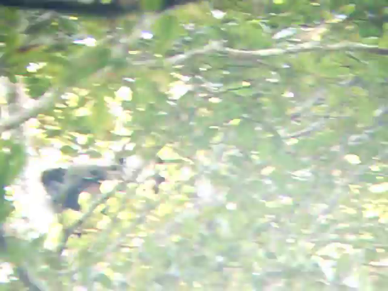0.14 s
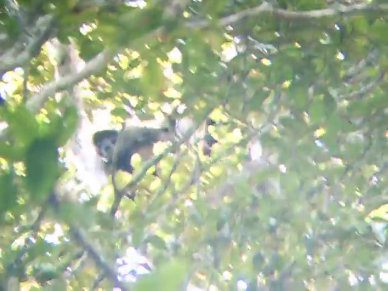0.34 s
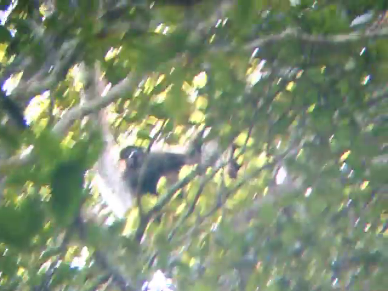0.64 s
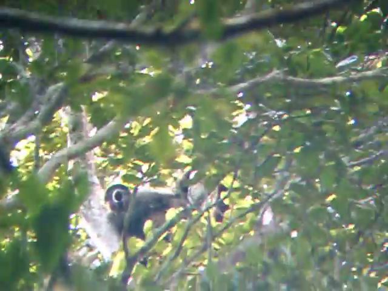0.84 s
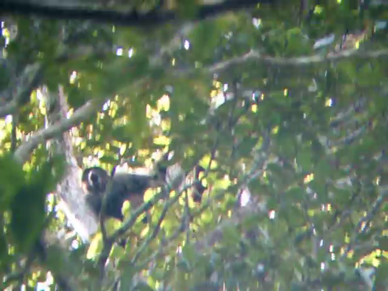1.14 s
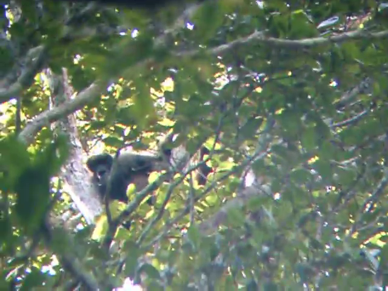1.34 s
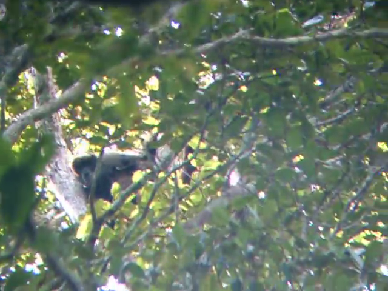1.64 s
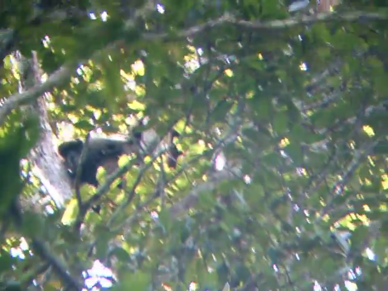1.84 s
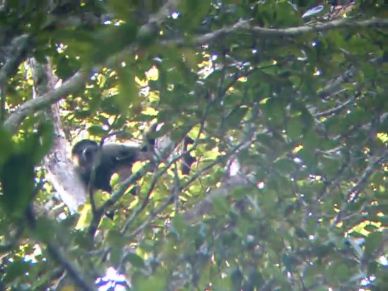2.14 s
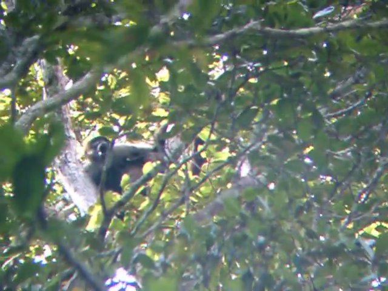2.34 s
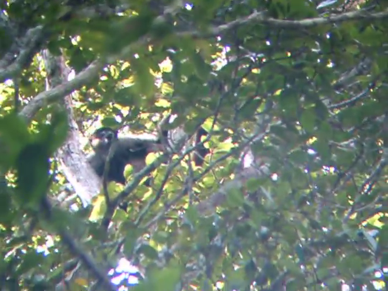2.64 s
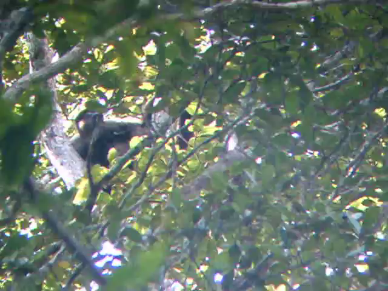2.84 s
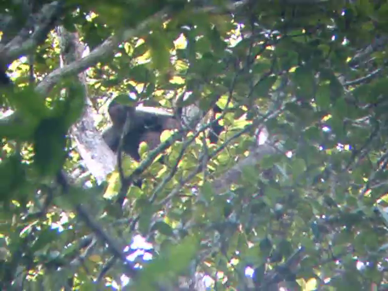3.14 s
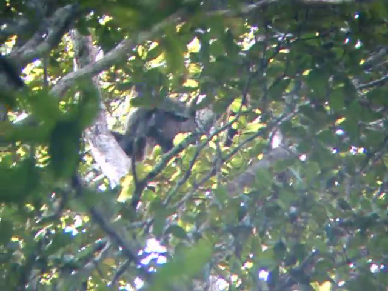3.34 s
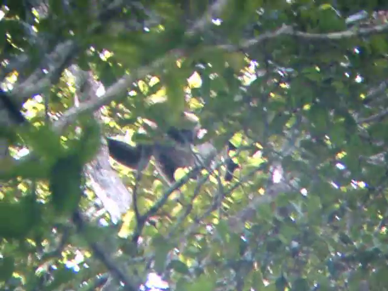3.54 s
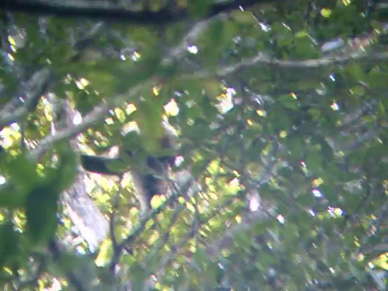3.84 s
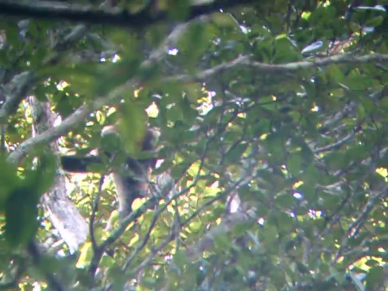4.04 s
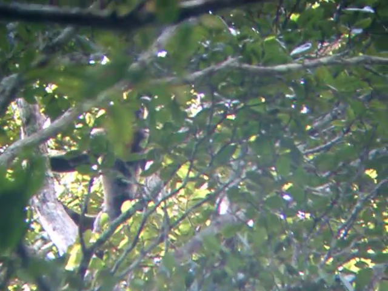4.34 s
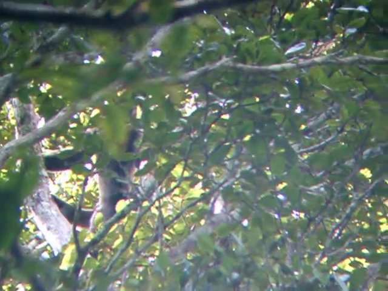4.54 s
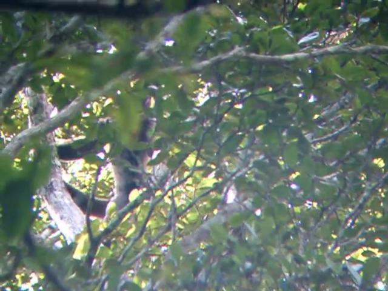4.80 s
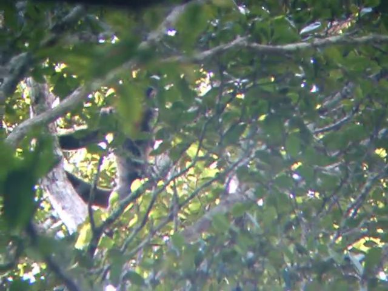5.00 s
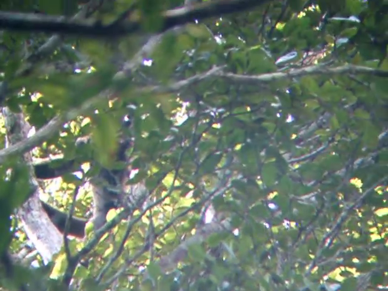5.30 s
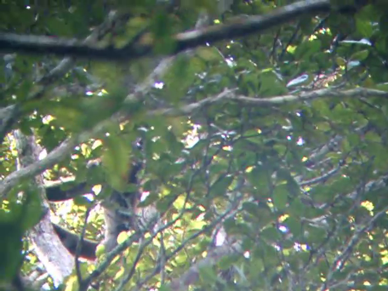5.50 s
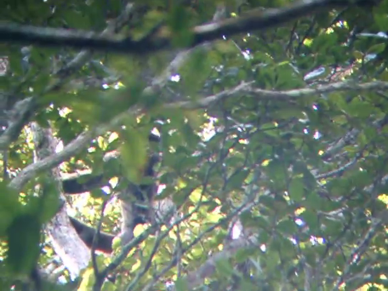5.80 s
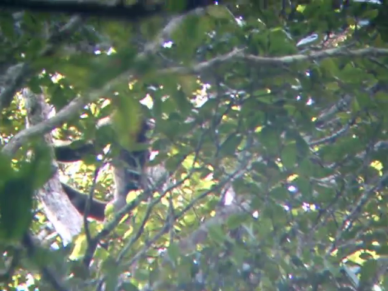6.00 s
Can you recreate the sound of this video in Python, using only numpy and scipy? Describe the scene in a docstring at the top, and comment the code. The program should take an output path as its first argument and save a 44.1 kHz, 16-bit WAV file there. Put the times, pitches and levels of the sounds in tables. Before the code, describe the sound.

A monkey in a rainforest canopy whistles short, arched, raspy calls nearly three a second, echoing among trees, with handling knocks and one sharp click.

```python
"""A monkey in the canopy gives short arched whistles, nearly three a second: near sines whose pitch climbs and
plunges, and which in most calls break into a rasp. Hoarse low notes (harmonics and throat noise), many under a
break where the cracking voice adds a rough lower pitch, and far moans (sliding tones) join them; dense decaying
echoes let the forest ring after every call. A cricket chirps and insects buzz high (narrow noise bands) over a
faint leafy hiss (shaped noise); fingers knock on the body of a hand-held camera, once hard (decaying modes)."""
import sys
import numpy as np
from scipy import signal
from scipy.fft import rfft
from scipy.io import wavfile
from scipy.ndimage import uniform_filter1d

SR = 44100
rng = np.random.default_rng(int(sys.argv[2]) if len(sys.argv) > 2 else 0)


def master(y):
    """Save y as 16-bit WAV."""
    cut = np.clip(np.atleast_2d(y).T, -1, 1)
    pcm = np.round(cut * 32767)  # scale
    wavfile.write(sys.argv[1], SR, pcm.astype(np.int16))


def magnitude_from_level(level_db):
    """Linear magnitude for a level in decibels (20 dB per decade)."""
    exponent = np.asarray(level_db, float) / 20
    return 10 ** exponent


N = 271656  # length in samples

# Whistles. Each row: start in seconds, length up to the foot of the plunge in seconds, top pitch in Hz,
# time constant of the plunge in seconds, opening level in dB, closing level in dB, step per overtone in dB.
WHISTLES = [(.045, .108, 1810, .017, -26, -22, -12), (.495, .168, 1870, .042, -27, -20.5, -10),
            (.922, .138, 1900, .028, -26, -21, -11), (1.235, .143, 1760, .018, -24, -22.5, -11),
            (1.58, .142, 1810, .015, -20, -22.5, -11), (2.0, .123, 1880, .018, -25, -19, -9),
            (2.4, .16, 1870, .022, -24, -20, -9.5), (2.78, .118, 1840, .02, -22, -23.5, -10),
            (3.105, .132, 1930, .024, -25, -23, -9), (3.435, .132, 1980, .018, -26, -26, -8),
            (3.782, .16, 1790, .012, -24, -23, -16), (4.315, .113, 1850, .024, -26, -21, -16),
            (4.668, .148, 2030, .028, -35, -26.5, -9), (4.985, .145, 1900, .024, -32, -27, -9),
            (5.29, .15, 1960, .025, -32, -26.5, -9), (5.6, .17, 1900, .028, -31, -25, -9),
            (5.975, .13, 1880, .03, -28, -24, -10)]
# Breaks, where the voice leaps up and cracks inside a whistle. Each row: start in seconds, length in seconds,
# pitch after the leap in Hz, pitch before the return in Hz, level in dB, added roughness (capped later),
# depth of the strong-weak pulsing (0-1).
BREAKS = [(.95, .066, 1930, 1922, -31, 0.65, 0.5), (1.266, .05, 2600, 2731, -27, .8, 0.4),
          (1.626, .065, 1850, 1817, -21.5, 0.56, 0.29), (2.045, 0.042, 1950, 1902, -26, .5, 0.08),
          (3.139, .045, 2250, 2029, -28.5, 0.7, 0.4), (3.469, .078, 2850, 2100, -21.5, 0.65, 0.47),
          (3.834, .055, 2250, 2105, -24.5, 1.1, .35), (4.682, .075, 2708, 2100, -24.5, .65, 0.2),
          (5.004, 0.048, 2210, 2256, -25, 0.36, 0.3), (5.317, .058, 2700, 2390, -23, 0.6, 0.3),
          (5.65, .055, 2250, 2600, -25, 0.8, 0.5), (6.015, .045, 1950, 1885, -26.5, 0.7, 0.4)]
# Throat response, with dips that a falling partial drops through. Each row: frequency in Hz, gain in dB.
THROAT = [(1200, 0), (1400, -5), (1650, 0), (2450, -2), (2750, -5), (2900, -18), (3150, -3), (3900, 0),
          (4400, -18), (5000, 0), (5600, -2), (6200, -14)]
# Hoarse low notes, many under a break, where the cracking voice adds a rough lower pitch. Each row: start in
# seconds, level in dB, length in seconds, middle pitch in Hz, step per overtone in dB, roughness (0-1).
LOW_NOTES = [(0.206, -40.5, 0.09, 1200, -12.5, .8), (.56, -37.5, 0.054, 1175, -19.5, .9),
             (0.985, -35, .07, 1120, -16, .75), (1.266, -29, 0.038, 1134, -12, .5),
             (1.318, -44, 0.038, 1000, -28, .9), (2.05, -47, .05, 928, -29, .9),
             (2.436, -40.5, .06, 900, -18.5, .8), (3.01, -33, 0.089, 1117, -15.5, .6),
             (3.155, -30, 0.066, 1120, -10, .65), (3.466, -28, .11, 1120, -12, .75),
             (3.84, -31, 0.075, 956, -10, .95), (4.666, -32, 0.035, 1150, -8, .6),
             (4.725, -27.5, 0.04, 1090, -8, .75), (5.015, -25.5, .045, 1120, -14, .2),
             (5.092, -31, 0.068, 1120, -23, .45), (5.315, -26, .06, 1120, -12, .45),
             (5.615, -29.5, .085, 1020, -22, .95), (6.015, -33, 0.09, 913, -6, .9),
             (6.1, -27, .05, 1150, -14, .3)]
# Throat resonances of a low note. Each row: frequency in Hz, width of one smoothing stage in Hz, level in dB.
LOW_NOTE_THROAT = [(798, 100, -5.5), (1104, 120, 12.5), (2310, 530, 20), (3900, 1000, -21)]
# Falling moans. Each row: start in seconds, level in dB, length in seconds, first pitch in Hz, last pitch in Hz.
MOANS = [(1.43, -31.5, 0.057, 1132, 960), (2.325, -35.5, 0.058, 1270, 1080),
         (2.625, -34.5, 0.12, 1250, 765), (4.2, -35, .075, 1241, 1083), (4.615, -47, 0.046, 1550, 1210)]
# Reverberation of the forest. Each row: frequency in Hz, time to decay by 60 dB in seconds.
FOREST_DECAY = [(600, 0.6), (1200, 0.81), (2000, 0.66), (4000, 1.035), (7000, 0.59)]
# Knocks. Each row: start in seconds, strength in dB, tilt of the modes above 600 Hz in dB per octave,
# level of the hollow after-ring in dB.
KNOCKS = [(.045, -33, -5, -63), (.185, -29.5, -21, -41.5), (.342, -34, -8, -45), (0.669, -43.5, 8, -54),
          (0.8479, -34.5, 12, -57), (.8507, -20.5, 9.5, -32), (.8527, -13, 5.5, -29.5),
          (1.082, -43, 7, -83), (1.571, -41, 8, -73), (1.639, -24, 7, -43.5), (1.79, -32, 5, -52.5),
          (1.898, -39, 7.5, -70), (2.088, -39, 2, -67), (2.415, -42, 8, -73), (3.247, -30.5, -7, -56),
          (3.626, -37.5, 3.5, -59), (4.1, -42, -7, -64), (4.141, -43, -3, -56), (5.028, -43, 9.5, -63),
          (6.113, -29.5, 6, -66)]
# Modes of the camera body. Each row: nominal frequency in Hz, relative level in dB, 60 dB decay in seconds.
BODY_MODES = [(202, -2.5, 0.028), (375, -1.5, 0.02), (577, 5.5, 0.026), (918, 4.5, 0.019),
              (1206, -3, 0.051), (1600, -6, 0.011), (2157, 8.5, 0.0046), (3140, -16, 0.022),
              (4500, -11, 0.0036), (6125, -20, 0.0089)]
# Spectrum of the hiss. Each row: frequency in Hz, relative level in dB per Hz.
HISS_SPECTRUM = [(15, -42), (25, -27.5), (47, -40), (85, -29), (724, -26), (1100, -12.5), (1510, -10.5),
                 (1740, -5), (1970, -23.5), (3450, -31.5), (4300, -27), (5300, -26), (6200, -25.5),
                 (8510, -43), (11100, -82.5), (18700, -120)]
# Lower insect bands. Each row: frequency in Hz, width of one smoothing stage in Hz, relative level in dB.
INSECTS = [(5755, 290, -6.5), (6030, 130, -3)]
# Swells and rests of the lower insect bands. Each row: time in seconds, gain in dB.
CHORUS_SWELL = [(0.0, -58), (1.1, -54), (1.97, -60.5), (2.25, -63), (2.6, -58.5), (3.6, -53), (4.3, -57.5),
                (5.4, -60.5), (6.16, -56)]
# Swells and rests of the higher insect band. Each row: time in seconds, level in dB before the throb.
HIGH_BUZZ_SWELL = [(0, -76.5), (3.9, -76), (4.3, -68), (5.6, -64.5), (6.16, -69)]
# Chirps of the cricket. Each entry: start in seconds.
CHIRPS = [-.16, .25, .67, 1.08, 1.5, 1.93, 2.36, 2.78, 3.19, 3.6, 4.0, 4.45, 4.88, 5.33, 5.8]


def evened(x):
    """Power normalisation: scales to rms 1."""
    return x / np.sqrt(np.mean(x ** 2) + 1e-20)


def read(points, hz):
    """Interpolation of a spectrum along a logarithmic frequency axis."""
    f, value = np.transpose(points)
    return np.interp(np.log(hz + 1), np.log(f + 1), value)


def add(mix, s, sound):
    """Superposition: lays a sound into the mix at s seconds."""
    part = mix[round(s * SR):][:len(sound)]
    part += sound[:len(part)]


def resonate(x, hz, width):
    """Resonance by heterodyning: shifts hz down to zero, smooths twice and shifts back."""
    carrier = np.exp(2j * np.pi * np.cumsum(hz * np.ones(len(x))) / SR)
    r = np.exp(-np.pi * width / SR)
    smooth = signal.lfilter([(1 - r) ** 2], [1, -2 * r, r ** 2], x / carrier)
    return 2 * (carrier * smooth).real


def wobble(n, seconds):
    """Random modulation: white noise averaged over a short time, of rms 1."""
    return evened(uniform_filter1d(rng.standard_normal(n), max(round(seconds * SR), 2)))


def hiss():
    """Spectral shaping of noise: leaves and microphone noise as random short-time spectra with faint patches."""
    frames, hz = N // 512 + 5, np.fft.rfftfreq(2048, 1 / SR)
    real, imaginary, patches = rng.standard_normal((frames, 1025, 3)).T
    patches = evened(uniform_filter1d(uniform_filter1d(patches, 20, 0), 8, 1))
    spectrum_db = read(HISS_SPECTRUM, hz)[:, None] + 1.5 * patches
    spectra = (real + 1j * imaginary) * magnitude_from_level(spectrum_db)
    noise = signal.istft(spectra, nperseg=2048, noverlap=1536)[1][:N]
    return magnitude_from_level(-39.5) * evened(noise)


def insects():
    """Amplitude modulation: a far chorus of narrow noise bands throbs fast while it swells and rests."""
    throb_hz, throb_depth = 40, .4
    t = np.arange(N) / SR
    low = sum(magnitude_from_level(db) * evened(resonate(rng.standard_normal(N), f, w)) for f, w, db in INSECTS)
    high = evened(resonate(rng.standard_normal(N), hz=7800, width=900))
    low *= magnitude_from_level(np.interp(t, *np.transpose(CHORUS_SWELL)))
    high *= magnitude_from_level(np.interp(t, *np.transpose(HIGH_BUZZ_SWELL)))
    return (1 + throb_depth * np.sin(2 * np.pi * throb_hz * t)) * (low + high)


def cricket():
    """Gated resonance: bursts of a narrow band of noise, heard as a fuzzy tone."""
    chirp_s, ramp_s = 0.25, 0.022
    t = np.arange(N) / SR
    gate = sum(np.clip(np.minimum(t - s, s + chirp_s - t) / ramp_s, 0, 1) for s in CHIRPS)
    return magnitude_from_level(-53.5) * gate * evened(resonate(rng.standard_normal(N), hz=6105, width=110))


def contour(s, length, top_hz, plunge_s, opening_db, closing_db):
    """Exponential glides: time, pitch, level, plunge 0-1, strain and pulsing of a whistle and any break in it."""
    opening_hz, climb_s, foot_hz, linger_s = 1674, 0.02181, 1221.5, 0.022
    leap_s, return_s = .022, .004
    t = np.arange(-.008, length + linger_s + 0.017, 1 / SR)
    # the pitch climbs to the top, then plunges ever faster to its foot and lingers there
    plunge = np.exp(np.minimum(t - length, 0) / plunge_s)
    climb = (top_hz - opening_hz) * np.exp(-np.maximum(t, 0) / climb_s)
    hz = top_hz - climb - (top_hz - foot_hz) * plunge
    # the level reaches its closing value a little before the foot, then sinks
    level_db = np.interp(t, [0, length - 0.035, length, length + linger_s],
                         [opening_db, closing_db, closing_db - 7, closing_db - 16.5])
    strain, pulsing = np.zeros((2, len(t)))
    for at, span, up_hz, back_hz, db, rough, depth in BREAKS:
        u = s + t - at
        leap = np.clip(np.minimum(u / leap_s, (span - u) / return_s), 0, 1)
        hz += leap * (np.interp(u, [leap_s, span - return_s], [up_hz, back_hz]) - hz)
        level_db += leap * (db - level_db)
        strain += leap * rough
        pulsing += leap * depth
    return t, *(uniform_filter1d(c, size=200) for c in (hz, level_db, plunge, strain, pulsing))


def whistle(s, length, top_hz, plunge_s, opening_db, closing_db, steady_db):
    """Additive synthesis: a near sine and two overtones; a break brings rasps of noise around each partial,
    and alternately strong and weak pulses add lines half-way between the partials (period doubling)."""
    most_rough, hoarse = .85, .12  # roughness 0-1: highest, and of the unbroken voice
    t, hz, level_db, plunge, strain, pulsing = contour(s, length, top_hz, plunge_s, opening_db, closing_db)
    # overtones are faint at the opening, gain in the plunge and thin out in a high voice
    step_db = steady_db - 13.5 * np.clip(1 - t / 0.035, 0, 1) + 5 * plunge
    step_db -= 16 * np.clip((hz - 1950) / 400, 0, 1)
    warm = np.clip(t / .03, 0, 1)  # the basic hoarseness sets in gradually
    rough = np.clip(hoarse * warm + strain + .25 * plunge, .05, most_rough)
    turns = np.cumsum(hz * (1 + 0.0403 * rough * wobble(len(t), .003))) / SR
    third_db = 2 * step_db - 1 - 16 * plunge  # the plunge weakens the third partial
    voice = 0
    for k, db in enumerate([0, step_db, third_db]):
        partial_hz = (k + 1) * hz
        rasp = evened(resonate(rng.standard_normal(len(t)), partial_hz, (k + 1) * 280))
        frayed = np.minimum(rough * (1 + k / 3), most_rough)  # overtones fray first
        tone = np.sqrt(2) * np.sin(2 * np.pi * (k + 1) * turns)
        blend = np.sqrt(1 - frayed ** 2) * tone + frayed * rasp
        voice = voice + magnitude_from_level(db + read(THROAT, partial_hz)) * blend
    voice *= 1 + pulsing * np.cos(np.pi * turns)
    # air rushes through the strained throat
    breath = resonate(rng.standard_normal(len(t)), hz=4500, width=2000)
    breath = resonate(breath, hz=4500, width=2000)
    voice += strain * magnitude_from_level(-15) * evened(breath)
    voice *= 1 + .28 * wobble(len(t), .008)  # leaves in the path make the level flutter
    return s + t[0], magnitude_from_level(level_db) * voice * signal.windows.tukey(len(t), .15)


def forest(x):
    """Reverberation by scattering: trunks and leaves return dense random echoes, decaying faster in some bands."""
    echoes = np.zeros(N)
    for k in range(3):  # three sets of echoes take turns, so that no two calls ring alike
        hz, t, spectra = signal.stft(rng.standard_normal(SR + SR // 2), SR, nperseg=256)
        swell = np.clip(t / 0.0024, 0, 1)
        decay = magnitude_from_level(-60 * t / read(FOREST_DECAY, hz)[:, None])
        tail = signal.istft(spectra * swell * decay, SR, nperseg=256)[1]
        tail = tail / np.sqrt(np.mean(abs(rfft(tail)[1500:4500]) ** 2))  # unit gain about the calls' pitch
        share = np.sqrt(2 / 3) * np.cos(np.pi * (np.arange(N) / SR + k / 3))
        echoes += signal.fftconvolve(x * share, tail)[:N]
    return echoes


def knock(s, strength_db, tilt_db, hollow_db):
    """Modal synthesis: a tap rings the camera body's modes; a soft finger leaves the high ones quiet."""
    t = np.arange(round(.2 * SR)) / SR
    ring = np.zeros(len(t))
    for k, (hz, db, t60) in enumerate(BODY_MODES):
        mode_db = strength_db + db + tilt_db * np.log2(max(hz / 600, 1))
        tone = np.sin(2 * np.pi * hz * rng.uniform(1.0, 1.03) * t)
        ring += (-1) ** k * magnitude_from_level(mode_db - 60 * t / t60) * tone
    hollow_hz, hollow_t60 = 260.6, 0.3  # after-ring: Hz, 60 dB decay in s
    ring += magnitude_from_level(hollow_db - 60 * t / hollow_t60) * np.sin(2 * np.pi * hollow_hz * t)
    return s, ring * (1 - np.exp(-t / 0.00037))  # the contact builds up over a moment


def low_note(s, level_db, length, hz, step_db, rough):
    """Source and filter: harmonics, sagging the more the hoarser, blend with breath puffs that ring in the throat."""
    u = np.linspace(0, 1, round(length * SR))
    sag = 1 + .3 * rough * (.5 - u)
    waver = 1 + .07 * rough * wobble(len(u), .004)
    turns = np.cumsum(hz * sag * waver) / SR
    folds = sum(magnitude_from_level(k * step_db) * np.sin(2 * np.pi * (k + 1) * turns) for k in range(4))
    puffs = rng.standard_normal(len(u)) * np.maximum(1 + 0.83 * wobble(len(u), 0.002), 0)
    breath = 0
    for throat_hz, width, db in LOW_NOTE_THROAT:
        slope_db = step_db * np.log2(throat_hz / hz)
        breath = breath + magnitude_from_level(db + slope_db) * evened(resonate(puffs, throat_hz, width))
    voice = (1 - rough) * evened(folds) + rough * evened(breath)
    return s, magnitude_from_level(level_db) * evened(voice) * signal.windows.tukey(len(u), .4)


def moan(s, level_db, length, from_hz, to_hz):
    """Frequency modulation: a wavering tone and its octave slide down, blended with noise around the pitch."""
    rough = .65  # share of noise 0-1
    hz = np.linspace(from_hz, to_hz, round(length * SR))
    turns = np.cumsum(hz * (1 + .03 * wobble(len(hz), .004))) / SR
    tone = np.sin(2 * np.pi * turns) + magnitude_from_level(-18) * np.sin(4 * np.pi * turns)
    rasp = resonate(rng.standard_normal(len(hz)), hz, width=220)
    voice = (1 - rough) * evened(tone) + rough * evened(rasp)
    return s, magnitude_from_level(level_db) * evened(voice) * signal.windows.tukey(len(hz), .5)


def scene():
    """Superposition and clipping: near sounds overload the small microphone on the hardest knock
    and lose their bass; the background joins them."""
    calls, knocks = np.zeros((2, N))
    for table, voice in ((WHISTLES, whistle), (LOW_NOTES, low_note), (MOANS, moan)):
        for row in table:
            add(calls, *voice(*row))
    for row in KNOCKS:
        add(knocks, *knock(*row))
    ceiling = .62  # amplitude at which the microphone overloads
    near = np.clip(calls + magnitude_from_level(-1.5) * forest(calls) + knocks, -ceiling, ceiling)
    low_cut = signal.butter(N=4, Wn=180, btype="high", fs=SR, output="sos")
    near = signal.sosfilt(low_cut, near)
    return (near + hiss() + insects() + cricket())[None]


def top_cut(x):
    """Nothing passes above the cut-off."""
    return signal.sosfilt(signal.butter(12, 8660, fs=SR, output="sos"), x)


def record(dry):
    """Linear filtering: a low-pass limits the band to 8600 Hz, and a small constant offset is added."""
    low_pass = signal.firwin(255, 8600, window=("kaiser", 9), fs=SR)
    narrow = signal.oaconvolve(dry, low_pass[None], "same")
    finished = narrow + .003
    return top_cut(finished)


dry = scene()
out = record(dry)
master(out)
```